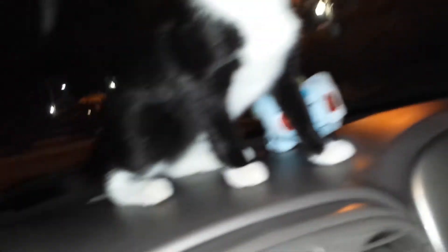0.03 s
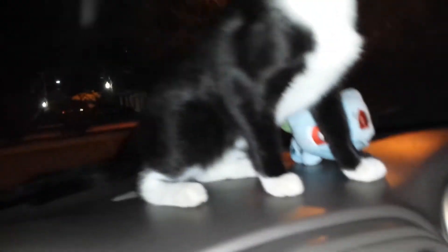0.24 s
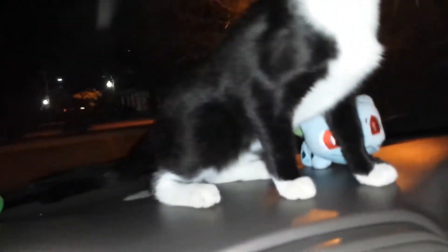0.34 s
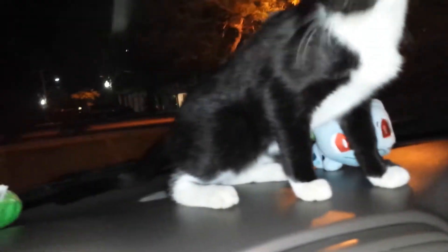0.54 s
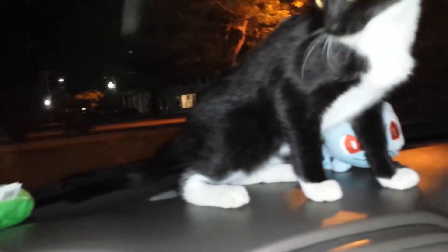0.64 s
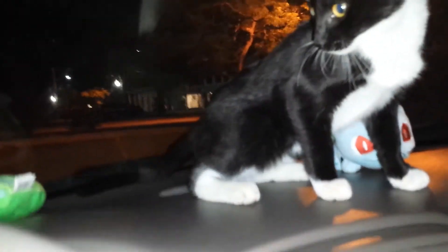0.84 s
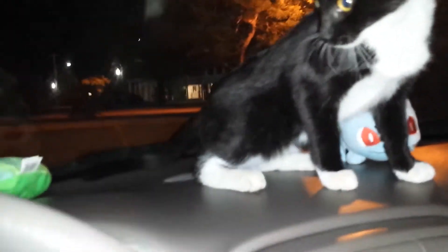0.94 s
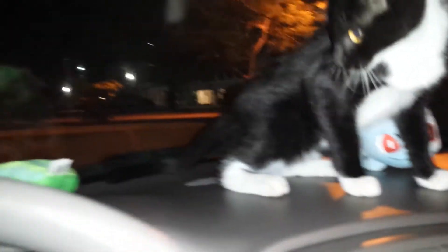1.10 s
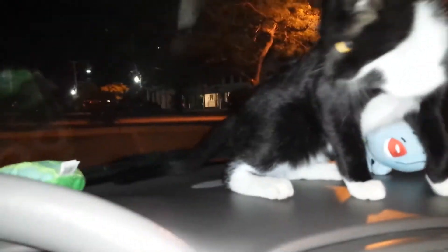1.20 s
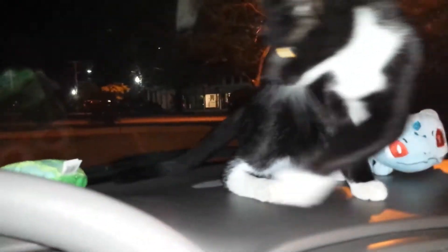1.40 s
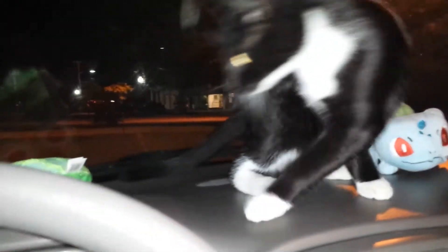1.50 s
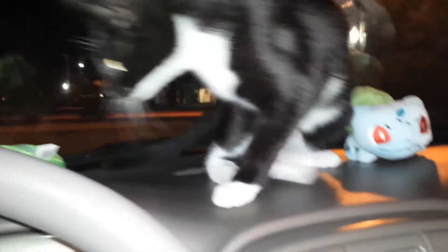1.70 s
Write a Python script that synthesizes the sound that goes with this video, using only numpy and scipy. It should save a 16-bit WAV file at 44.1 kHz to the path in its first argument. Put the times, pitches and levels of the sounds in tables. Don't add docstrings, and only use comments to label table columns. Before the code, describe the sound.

Cat paws scuff and then patter in soft hollow thumps across a plastic car dashboard

```python
import sys
import numpy as np
from scipy import signal
from scipy.fft import rfft, irfft
from scipy.io import wavfile
from scipy.ndimage import uniform_filter1d

SR = 44100
rng = np.random.default_rng(int(sys.argv[2]) if len(sys.argv) > 2 else 0)


def level_to_linear(level):
    exponent = np.asarray(level, float) / 20
    return 10 ** exponent


def store_wav(level_fs):
    pcm = np.round(np.clip(np.atleast_2d(level_fs), -1, 1) * 32767)
    wavfile.write(sys.argv[1], SR, pcm.T.astype(np.int16))


N = 77175


def evened(x):
    return x / np.sqrt(np.mean(x ** 2) + 1e-20)


def read(points, hz):
    f, value = np.transpose(points)
    return np.interp(np.log(hz + 1), np.log(f + 1), value)


def add(mix, start_s, sound):
    part = mix[..., max(round(start_s * SR), 0):][..., :sound.shape[-1]]
    part += sound[..., :part.shape[-1]]


def drift(smooth_samples):
    return evened(uniform_filter1d(rng.standard_normal(N), size=smooth_samples))


def panned(level_db, left_right_db):
    return level_to_linear(level_db + np.array([[left_right_db / 2], [-left_right_db / 2]]))


def hiss(colour, same, balance, lag_s, patchy_db):
    frames, hz = N // 256 + 5, np.fft.rfftfreq(1024, 1 / SR)
    a, b, c, d, patches = rng.standard_normal((frames, 513, 5)).T
    patches = uniform_filter1d(patches, size=10, axis=0, mode="wrap")
    patches = evened(uniform_filter1d(patches, size=8, axis=1))
    like = np.clip(read(same, hz), -1, 1)[:, None]
    shared = a + 1j * b
    left = shared * np.exp(-2j * np.pi * hz * lag_s)[:, None]
    right = like * shared + np.sqrt(1 - like ** 2) * (c + 1j * d)
    tilt = read(balance, hz)[:, None] / 2
    gain_db = read(colour, hz)[:, None] + patchy_db * patches + np.array([tilt, -tilt])
    z = np.array([left, right]) * level_to_linear(gain_db)
    return evened(signal.istft(z, nperseg=1024, noverlap=768)[1][:, :N])


# frequency_hz, density_db (per Hz)
FLOOR_COLOUR = [(20, 15.5), (60, 3), (130, 3.5), (350, -11.5), (650, -21), (3200, -30.5), (8500, -22),
                (16000, -26.5)]
# frequency_hz, left_right_likeness (-1 to 1)
FLOOR_LIKENESS = [(60, 1), (240, 0.76), (950, 0.21), (3770, -0.063), (15000, 0.056)]


def background():
    balance = [(100, 0.96), (4000, -0.13), (9000, -5.5)]  # frequency_hz, left_right_db
    return level_to_linear(-45.5) * hiss(FLOOR_COLOUR, FLOOR_LIKENESS, balance, lag_s=0, patchy_db=2.76)


# multiple_of_fundamental, level_db
BUZZ_PARTIALS = [(2, -9), (3, -8), (4, -9), (5, 5), (6, -6), (7, -18), (8, -19)]


def buzz():
    fundamental_hz, width_hz = 1803, 89
    hz = np.fft.rfftfreq(N, 1 / SR)
    comb = 0
    for k, db in BUZZ_PARTIALS:
        offset = (hz - round(k) * fundamental_hz) / (width_hz * np.sqrt(k))
        comb = comb + level_to_linear(db) / (1 + offset ** 2)
    stack = evened(irfft(rfft(rng.standard_normal((N, 2)).T) * comb, N))
    throb = level_to_linear(0.9 * drift(900))
    return panned(-61, -10) * throb * stack


# frequency_hz, t60_s
CABIN_DECAY = [(150, 0.28), (400, 0.12), (1000, .1), (4000, 0.064)]


def cabin(x):
    shared, own = rng.standard_normal(SR // 4), rng.standard_normal((2, SR // 4))
    hz, t, z = signal.stft(shared + 0.34 * own, SR, nperseg=512)
    decay = level_to_linear(-60 * t / read(CABIN_DECAY, hz)[:, None])
    tail = signal.istft(z * decay * (hz > 140)[:, None], SR, nperseg=512)[1]
    build_up_s = 0.0079
    tail = tail * np.minimum(np.arange(tail.shape[1]) / (build_up_s * SR), 1)
    low = signal.lfilter(*signal.butter(1, 500, fs=SR), tail[0])
    return signal.fftconvolve(x, tail / np.linalg.norm(low) * 0.13, axes=1)[:, :N]


# frequency_hz, left_right_db
PORT_BALANCE = [(300, -1), (900, 3), (2400, 4), (5500, 9), (6800, -4), (8200, -9), (10500, -2), (15000, -5)]
# frequency_hz, left_right_likeness (-1 to 1)
NEAR_LIKENESS = [(100, 0.36), (700, 0.98), (2000, 0.31), (5000, 0.2), (12000, 0.13)]


def near_noise(colour, patchy_db):
    return hiss(colour, NEAR_LIKENESS, PORT_BALANCE, lag_s=0.0003073, patchy_db=patchy_db)


# time_s, level_db
SLIDE_LEVEL = [(0, -50), (.09, -48.5), (.13, -40.5), (.19, -33), (.245, -35), (.28, -48), (.36, -53.5),
               (.5, -54.5), (.72, -55.5), (.8, -63.5), (1.4, -61.5), (1.44, -48), (1.49, -48),
               (1.53, -64.5), (1.62, -53.5), (1.67, -53.5), (1.71, -46), (1.75, -60.5)]
# frequency_hz, density_db (per Hz)
FUR_COLOUR = [(300, -15.5), (750, 0), (1300, -9), (2300, -5.5), (3700, -9), (5800, -1.5), (9000, -9.5),
              (14000, -26)]


def slides():
    t = np.arange(N) / SR
    level_db = np.interp(t, *np.transpose(SLIDE_LEVEL))
    env = level_to_linear(level_db)
    mode_hz, _, mode_t60 = THUMP_MODES[0]
    u = t[:SR // 4]
    mode = level_to_linear(-60 * u / mode_t60) * np.sin(2 * np.pi * mode_hz * u)
    rumble = level_to_linear(-16) * env * evened(signal.oaconvolve(rng.standard_normal(N), mode)[:N])
    grit = level_to_linear(0.5 * drift(90))
    fur = near_noise(FUR_COLOUR, patchy_db=-3.5)
    drag = signal.filtfilt(*signal.butter(2, 1490, fs=SR), fur)
    light_db, firm_db = -64.5, -44
    light = np.clip((firm_db - level_db) / (firm_db - light_db), 0, 1)
    return env * grit * (fur - light * drag) + rumble


# start_s, level_db, pitch_hz, left_right_db
CLAW_TICKS = [
    (1.0692, -24.5, 2500, 12),
    (1.0815, -35, 7000, 2),
    (1.0852, -43, 3200, 4),
    (1.103, -47, 4000, 3),
]


def ticks():
    out, t = np.zeros((2, N)), np.arange(800) / SR
    click_cycles, knock_db, knock_hz, knock_t60 = 0.33, -11.5, 750, 0.017
    grains = rng.standard_normal((len(CLAW_TICKS), 800))
    for (start_s, level_db, pitch_hz, left_right_db), grain in zip(CLAW_TICKS, grains):
        u = pitch_hz * t / click_cycles * min(1, np.sqrt(3000 / pitch_hz))
        click = np.sin(2 * np.pi * pitch_hz * t) * u * np.exp(1 - u)
        click = click + level_to_linear(-30 - 60 * t / 0.012) * grain
        knock = sum(np.sin(2 * np.pi * knock_hz * k * t) for k in (0.55, 1, 1.35))
        knock = level_to_linear(knock_db - 60 * t / knock_t60) * knock
        tick = click + knock * (2700 / pitch_hz) ** 2
        add(out, start_s, panned(level_db, left_right_db) * tick)
    return out


def ring(modes, rise_s, chance, spread_db, detune, hardness_db):
    t = np.arange(SR // 3) / SR
    hz, db, t60 = np.transpose(modes)[:, :, None]
    n = len(modes)
    pitch_chance, level_chance, side_chance = chance[:3 * n].reshape(3, n, 1)
    hz = hz * (1 + detune * pitch_chance)
    db = db + spread_db * level_chance + hardness_db * np.log2(np.maximum(hz, 300 ** 2 / hz) / 350)
    side_db = 0.8 * side_chance * np.minimum(hz / 600, 1)
    left_t = np.maximum(t - 0.00023, 0)
    ports = []
    for way, u in ((1, left_t), (-1.4, t)):
        partials = level_to_linear(db + way * side_db - 60 * u / t60) * np.sin(2 * np.pi * hz * u)
        ports.append(partials.sum(0) * (1 - np.exp(-u / rise_s)))
    x = np.array(ports)
    return x / np.sqrt(np.mean(x[:, :SR // 40] ** 2))


# start_s, slap_db, cabin_thump_db, panel_ring_db, hardness_db (per octave)
PAW_STEPS = [(.2495, -15, -43.5, -25.5, 12.5), (.259, -16.5, -28.5, -21, 3), (.3975, -39, -27, -34.5, -34),
             (0.4048, -19.5, -21, -21, 2), (0.4103, -20.5, -41, -26, 4), (.548, -23, -30.5, -24, 0.5),
             (0.5557, -18.5, -24, -21.5, 2.5), (.7055, -34.5, -32.5, -46.5, -16),
             (0.8444, -22, -24.5, -25.5, 1.5), (0.99, -25, -25, -29.5, 3.5),
             (1.1278, -26.5, -29, -35.5, -1), (1.2842, -30.5, -26.5, -29.5, -2),
             (1.4257, -48.5, -77, -45, -18), (1.4525, -25.5, -26, -27.5, 4.5),
             (1.598, -40.5, -66, -59.5, 20.5), (1.6832, -40.5, -74, -43, -14.5)]
# frequency_hz, level_db, t60_s
PANEL_MODES = [(181.5, -4.5, 0.12), (243, -12.5, 0.17), (283.9, -5.5, 0.084), (315.5, 2.5, 0.07),
               (346.3, -3, 0.057), (413.6, -2, 0.069), (499.7, -2.5, 0.05), (504.6, -5.5, 0.04),
               (629.7, -3.5, 0.048), (690, -7, 0.04), (762, -6.5, .05), (885, -30.5, 0.047),
               (1049, -13, 0.033), (1267, -23.5, 0.073)]
# frequency_hz, level_db, t60_s
THUMP_MODES = [(110.6, -3.5, 0.15), (125.4, -1.5, 0.077), (70, -56, 0.19)]
# frequency_hz, density_db (per Hz)
SLAP_COLOUR = [(710, -11.5), (1200, -1), (1520, -5.5), (2830, -3.5), (3110, -7), (5650, -3.5), (7100, -7.5),
               (12100, -25), (16000, -31)]


def steps():
    out, t = np.zeros((2, N)), np.arange(-SR // 100, SR // 5) / SR
    rise_s, slap_t60, tail_db, tail_t60 = 0.002, 0.048, -22, 0.17
    fall = level_to_linear(-60 * t / slap_t60) + level_to_linear(tail_db - 60 * t / tail_t60)
    shape = np.where(t < 0, np.exp(np.minimum(t, 0) / rise_s), fall)
    crack = level_to_linear(4.5 - 60 * abs(t) / 0.031)
    grit = level_to_linear(0.5 * drift(40))
    noise = grit * near_noise(SLAP_COLOUR, patchy_db=3.0)
    chances = rng.standard_normal((len(PAW_STEPS), 60))
    for k, (step, chance) in enumerate(zip(PAW_STEPS, chances)):
        start_s, slap_db, thump_db, panel_db, hardness_db = step
        part = noise[:, k * N // 20:][:, :len(t)]
        slap = shape * (part + crack * np.gradient(part, axis=1))
        slap = slap * np.linalg.norm(shape) / np.linalg.norm(slap.mean(0))
        panel = ring(PANEL_MODES, 0.0006, chance, spread_db=2.93, detune=0.027, hardness_db=hardness_db)
        thump = ring(THUMP_MODES, 0.0062, chance[45:], spread_db=-1.2, detune=0.0034, hardness_db=0)
        push_s = start_s + 0.00062
        add(out, start_s + t[0], level_to_linear(slap_db - 9) * slap)
        add(out, push_s, level_to_linear(panel_db) * panel)
        add(out, push_s, level_to_linear(thump_db) * thump)
    return out


def scene():
    paws = steps()
    near = paws + slides() + ticks() + buzz() + background()
    return near + level_to_linear(-9.5) * cabin(paws)


def roll_off(x):
    return signal.sosfilt(signal.butter(12, 16480, fs=SR, output="sos"), x)


def record(dry):
    x = signal.lfilter(*signal.butter(2, 60, "high", fs=SR), dry)
    x = signal.oaconvolve(x, signal.firwin(301, 15700, fs=SR)[None], "same")
    return roll_off(x)


dry = scene()
out = record(dry)
store_wav(out)
```